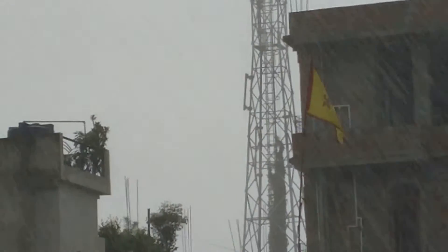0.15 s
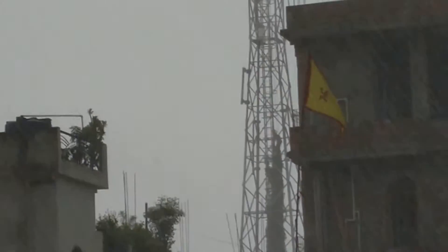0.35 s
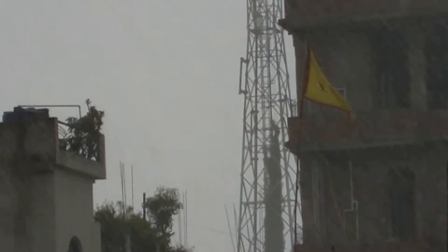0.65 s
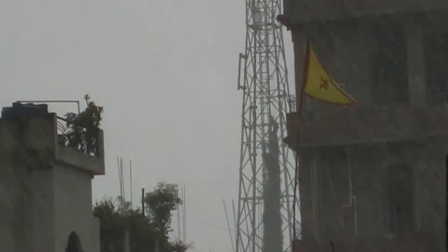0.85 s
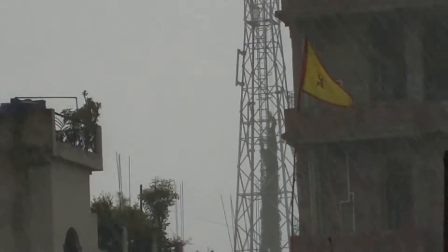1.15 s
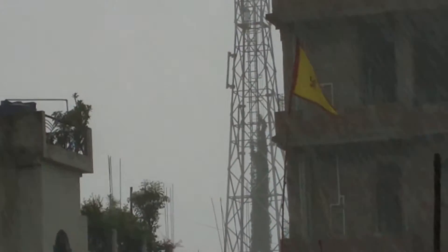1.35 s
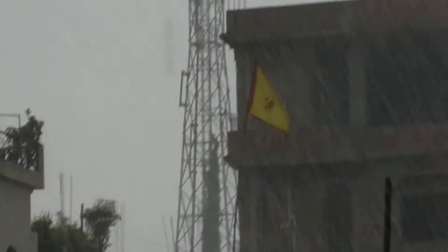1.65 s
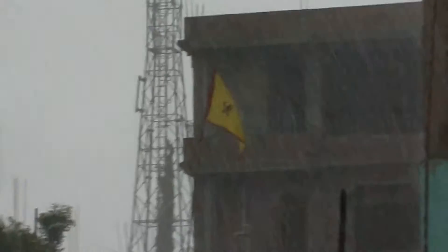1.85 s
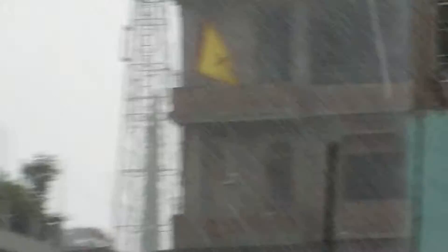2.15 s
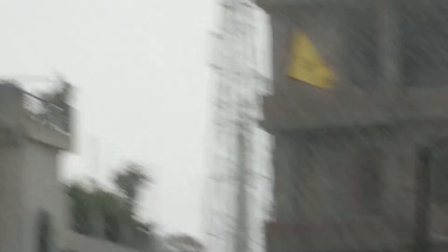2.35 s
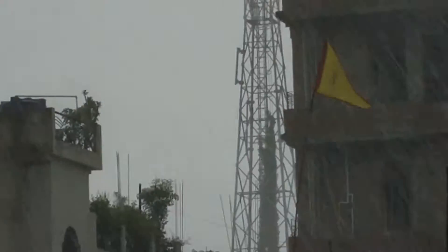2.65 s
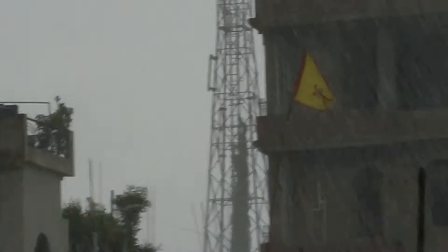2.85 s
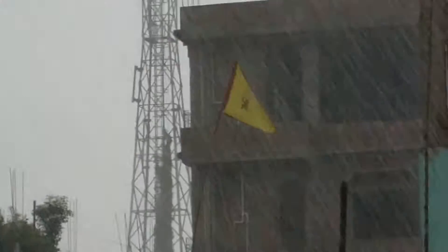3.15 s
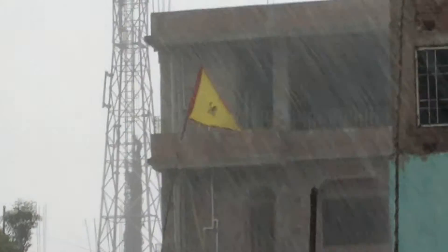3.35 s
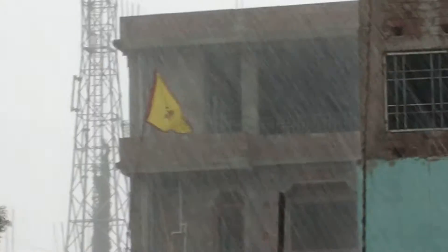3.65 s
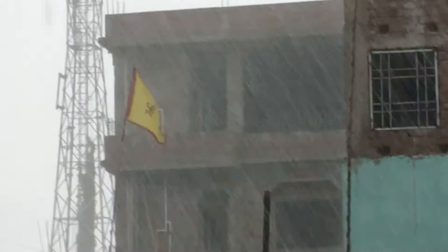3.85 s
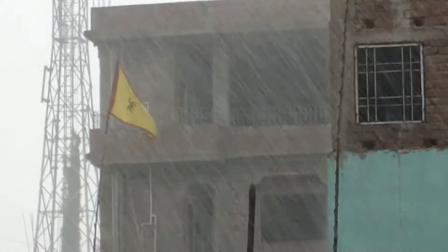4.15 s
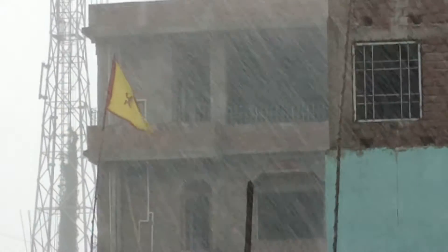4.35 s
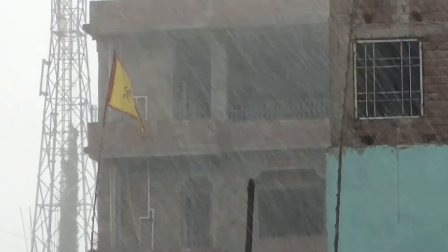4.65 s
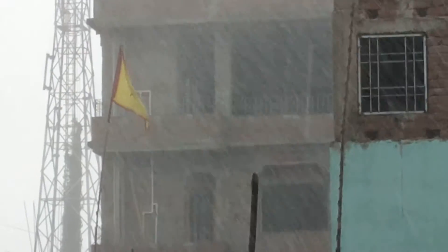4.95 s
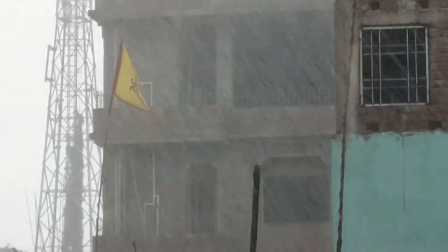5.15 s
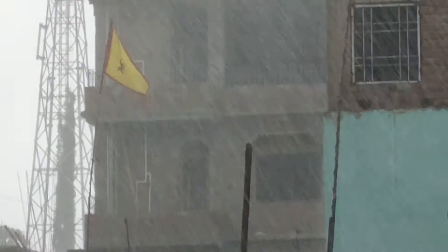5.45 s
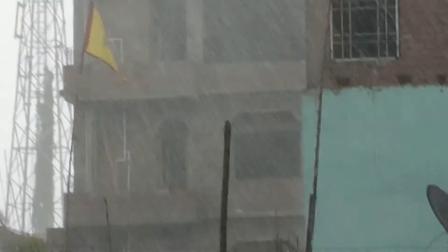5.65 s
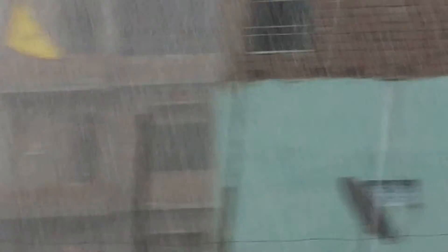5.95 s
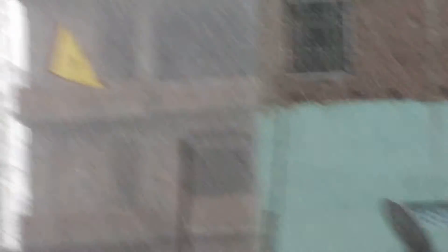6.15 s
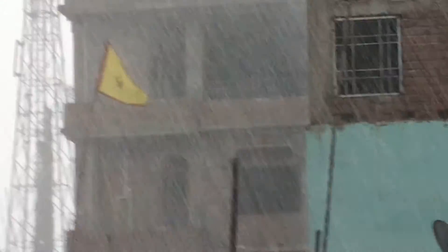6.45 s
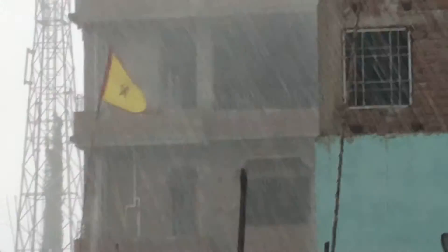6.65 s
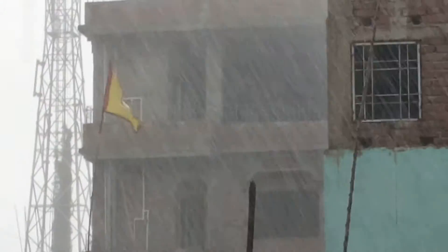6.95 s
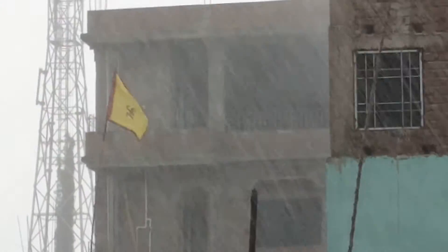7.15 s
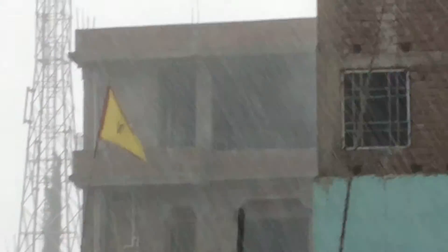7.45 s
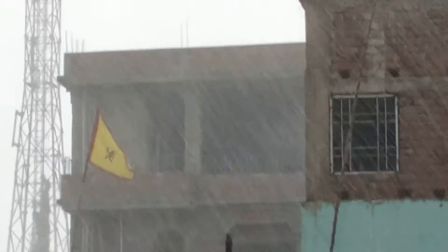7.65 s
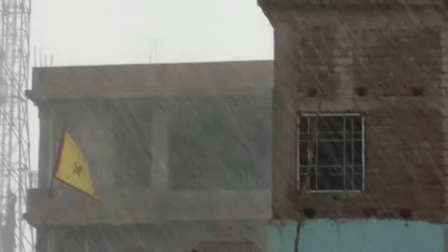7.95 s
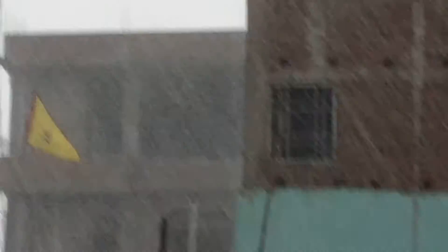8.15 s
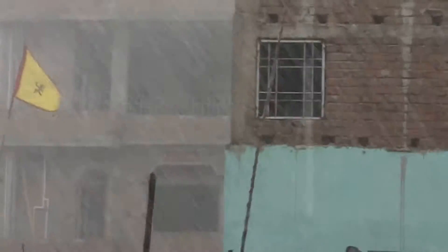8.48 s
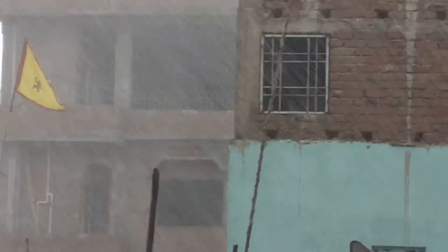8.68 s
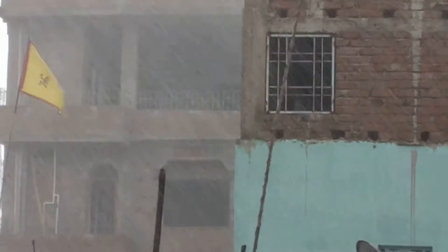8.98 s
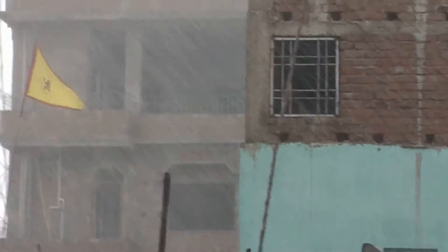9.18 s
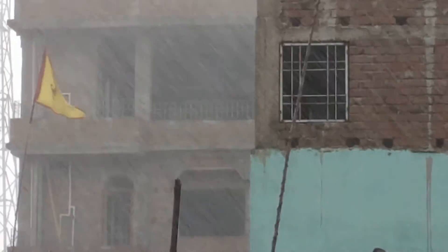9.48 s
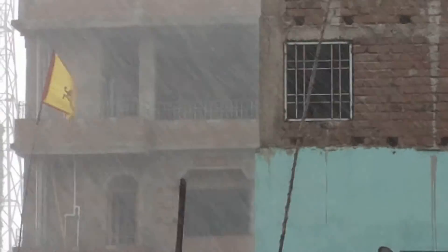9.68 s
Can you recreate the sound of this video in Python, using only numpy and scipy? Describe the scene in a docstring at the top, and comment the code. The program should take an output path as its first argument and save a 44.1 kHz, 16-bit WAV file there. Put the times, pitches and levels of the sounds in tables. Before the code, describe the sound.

Steady heavy rain heard from a shelter's edge in a town. Bright, crisp near drops tick densely and swing in strength, loudest at the start and thinner after the middle. Scattered big drops smack sharply close by, one hardest near three seconds. Wind rumbles and thumps the microphone through the first six seconds, then calms. A soft far wash of rain on roofs and streets runs throughout.

```python
"""Bright ticks and spatter of near rain, swinging closer and away with the wind, heard from a shelter's edge.
Near drops are filtered random clicks with splashes; the largest are short rings with spray.
Runoff slaps on wet ground in clusters of duller ticks; gusts rumble and thump at the microphone.
Far roofs and streets in a town give a steady wash of filtered noise and a hiss of dense clicks."""
import sys
import numpy as np
from scipy import signal
from scipy.fft import rfft, irfft
from scipy.io import wavfile

SR = 44100
rng = np.random.default_rng(int(sys.argv[2]) if len(sys.argv) > 2 else 0)


def wav_out(sig):
    """Save sig, one row per channel (or a flat mono array), as 16-bit PCM at SR to the path in sys.argv[1]."""
    wavfile.write(sys.argv[1], SR, np.round(np.clip(np.atleast_2d(sig).T, -1, 1) * 32767).astype(np.int16))


N = 433062
TIME = np.arange(N) / SR  # seconds

# Strength of the near rain as the wind swings it. Each row: time in seconds, relative level in dB.
SHOWER = [(0, -15), (.5, -17.5), (1.8, -16.5), (2.65, -22.5), (3.4, -19.5), (4.45, -20.5), (5.7, -27),
          (6.5, -28.5), (6.85, -25), (8.85, -22), (9.25, -27), (9.82, -26.5)]
# Spectrum of near drops. Each row: frequency in Hz, relative density in dB per Hz.
TICK = [(1500, -64), (3000, -45), (4000, -33.5), (5000, -26), (6000, -11), (6700, -5), (7200, 0),
        (7550, 0.8), (7720, 0.5), (8000, -15.5), (8250, -15.5), (8480, -31.5), (8650, -66)]


def patter():
    """Near drops tick in flurries, each followed by its splash."""
    hits = impacts(per_s=2100, spread_db=3.5, largest=4.2)
    crown = 0.8 * splash(hits, decay_s=0.003, per_s=5000)  # the drop bursts
    spray = 1.02 * splash(hits, decay_s=0.0035, per_s=4000)  # its finer droplets
    ticks = evened(colour(hits + crown + spray, TICK))
    level_db = follow(SHOWER) - 5.0 + 0.85 * drift(25)
    return ticks * gain_of(level_db)


def splash(hits, decay_s, per_s):
    """Every impact throws fine droplets that patter down with fading strength."""
    fade = np.exp(-2 / (decay_s * SR))  # of energy, so amplitude fades over decay_s
    energy = signal.lfilter([1 - fade], [1, -fade], hits ** 2)
    droplets = evened(rng.standard_normal(N) * (rng.random(N) < per_s / SR))
    return np.sqrt(energy) * droplets


def large_drops():
    """A short ringing smack, a second as the drop collapses, and a dying scatter of droplets."""
    # The largest drops, landing close by. Each row: start in seconds, relative peak in dB.
    drops = [(0.2088, -10), (0.2217, -6), (0.619, -8), (0.6802, -5), (0.933, -4), (0.9818, -11),
             (1.289, -11), (1.3203, -6.5), (1.5598, -5.5), (2.139, -6), (2.4238, -5), (2.5293, -7),
             (3.1232, -0.5), (3.461, -6), (3.555, -6), (3.5991, -13), (3.861, -10), (3.918, -16),
             (4.0368, -4), (4.1067, -11.5), (4.2292, -9), (5.039, -9.5), (5.238, -11), (7.2113, -12),
             (7.5696, -9.5), (7.7122, -8.5), (8.0858, -8), (8.983, -9.5), (9.2528, -5)]
    pitch_hz, scatter_hz = 7240, 200
    smack_s, spray_decay_s, droplets_per_s = 0.0002, 0.022, 3000
    out, t = np.zeros(N), np.arange(3072) / SR
    for start_s, db in drops:
        hz = pitch_hz + scatter_hz * rng.standard_normal()
        age = t / smack_s
        ring = age ** 2 * np.exp(-age) * np.sin(2 * np.pi * hz * t)
        smack = colour(ring, TICK)
        smack *= gain_of(db - 0.8) / abs(smack).max()
        add(out, start_s, smack)
        add(out, start_s + rng.uniform(0.0014, 0.011), 0.48 * smack)
        droplets = evened(rng.standard_normal(len(t)) * (rng.random(len(t)) < droplets_per_s / SR))
        spray_db = 0.97 * db - 15.5  # bigger drops throw stronger spray
        add(out, start_s, gain_of(spray_db) * colour(droplets * np.exp(-t / spray_decay_s), TICK))
    return out


def runoff():
    """Gathered water breaks on the ground in duller ticks, louder in harder rain and in each slap."""
    # Slaps on wet ground. Each row: start in seconds, relative level in dB.
    slaps = [(1.72, -24), (2.754, -33), (3.115, -27), (5.501, -28.5), (6.39, -34), (7.09, -28.5),
             (7.14, -39), (7.58, -33.5), (8.1, -34), (8.54, -27), (8.76, -31), (8.87, -29)]
    # Runoff spectrum. Each row: frequency in Hz, relative density in dB per Hz.
    splat_spectrum = [(2000, -47.5), (3200, -35), (4300, -14), (5400, -3), (6500, -0.5), (7500, 7),
                      (8000, 0.5), (8600, -36)]
    trickle_db = -18  # between slaps, relative to the shower curve
    attack_s, decay_s = 0.00091, 0.033
    swell = gain_of(follow(SHOWER) + trickle_db + 2.5 * drift(18))
    t = np.arange(SR // 4) / SR
    slap = (1 - np.exp(-t / attack_s)) * np.exp(-t / decay_s)
    for start_s, db in slaps:
        add(swell, start_s, gain_of(db) * slap)
    ticks = evened(colour(impacts(per_s=2800, spread_db=3.5, largest=3.8), splat_spectrum))
    return gain_of(2.0) * swell * ticks


def wind():
    """A rolling rumble with sudden thumps; a thump of higher reach carries less deep bass."""
    # Hardest thumps. Each row: peak time in seconds, level in dB, upper reach in Hz.
    thumps = [(0.489, -29.5, 70), (.67, -31.5, 130), (0.859, -32, 70), (1.93, -34, 190), (2.134, -33, 130),
              (2.277, -29, 110), (2.335, -23.5, 101), (2.545, -28.5, 150), (2.63, -35, 120),
              (3.291, -35, 65), (4.215, -28, 248), (4.33, -39, 100), (4.48, -41, 101), (4.979, -35, 170),
              (5.711, -32.5, 220)]
    half_width_s = 0.016
    rumble = evened(eddies(reach_hz=133, size=N))
    out = rumble * wind_push() * gain_of(1.5 + 1.2 * drift(22))
    t = np.arange(-SR // 8, SR // 8) / SR
    push = np.exp(-0.5 * (t / half_width_s) ** 2)
    for peak_s, db, reach_hz in thumps:
        low_cut = signal.butter(1, 0.3 * reach_hz, "highpass", fs=SR)
        thump = push * signal.lfilter(*low_cut, eddies(reach_hz, size=len(t)))
        thump *= np.linalg.norm(push) / np.linalg.norm(thump)
        add(out, peak_s + t[0], gain_of(db) * thump)
    return out


def eddies(reach_hz, size):
    """Turbulent pressure: coloured noise that rolls off above its reach."""
    # Wind spectrum. Each row: frequency in Hz, relative density in dB per Hz.
    wind_spectrum = [(5, -18), (15, -1.5), (35, 0), (70, -3), (120, -3.5), (190, -7.5), (350, -13.5),
                     (700, -37), (2000, -67)]
    swirl = colour(rng.standard_normal(size + SR // 4), wind_spectrum, size=16384)
    low_pass = signal.butter(2, reach_hz, fs=SR, output="sos")
    return signal.sosfilt(low_pass, swirl)[-size:]  # drops the filters' onset


def wind_push():
    """Each gust swells out of the breeze, flutters, and dies a little faster than it came."""
    # Gusts. Each row: peak time in seconds, swell time in seconds, relative level in dB.
    gusts = [(.55, 0.1, -41), (.97, .14, -43.5), (1.5, .04, -48), (2.1, 0.18, -40), (2.58, 0.082, -35.5),
             (4.25, 0.22, -41), (4.96, 0.1, -36), (5.68, 0.12, -40), (6.2, 0.082, -41)]
    fall_ratio = 0.96  # dying time over swell time
    breeze_db, flutter_db, flutter_hz = -57, 3.5, 22
    power = np.zeros(N)
    for peak_s, swell_s, db in gusts:
        away = np.maximum(peak_s - TIME, (TIME - peak_s) / fall_ratio) / swell_s
        power += (gain_of(db) * np.exp(-away)) ** 2
    flutter = gain_of(flutter_db * drift(flutter_hz))
    return np.sqrt(gain_of(breeze_db) ** 2 + power * flutter ** 2)


def town():
    """Countless far drops merge into a low wash and a thin hiss."""
    # Rain on far roofs and streets. Each row: time in seconds, relative level in dB.
    town_level = [(0, -40.5), (4.7, -39), (5.8, -41), (8.4, -40), (9.82, -40.5)]
    # Spectra of wash and hiss. Each row: frequency in Hz, relative density in dB per Hz.
    wash_spectrum = [(20, -9.5), (60, -4), (120, -7), (165, -10), (240, -5.5), (380, -5), (425, -1),
                     (600, -4), (690, -2.5), (800, 1.5), (920, -1.5), (1020, -5.5), (1600, -12),
                     (2900, -26), (4000, -42.5)]
    hiss_spectrum = [(2000, -28), (3000, -15.5), (3600, -4.5), (4300, 0), (5200, 0), (6500, 5.5),
                     (7500, 14), (8000, -1.5), (8500, -37)]
    wash_db = follow(town_level) + 0.5 + 0.3 * drift(7.0)
    wash = colour(rng.standard_normal(N), wash_spectrum) * gain_of(wash_db)
    hiss = evened(colour(impacts(per_s=9000, spread_db=1.5, largest=2.9), hiss_spectrum))
    hiss_db = -36.0 + 0.15 * (follow(SHOWER) + 22.5) + 0.47 * drift(6)  # leans on the shower slightly
    return wash + hiss * gain_of(hiss_db)


def impacts(per_s, spread_db, largest):
    """Random clicks of either sign: many small, a few large, capped at largest * spread_db."""
    size = gain_of(spread_db * np.minimum(rng.exponential(1, N), largest))
    return size * rng.choice([-1., 1.], N) * (rng.random(N) < per_s / SR)


def colour(x, spectrum, size=4096):
    """Minimum-phase filter of unit energy with the given spectrum."""
    hz, db = np.transpose(spectrum)
    bin_hz = abs(np.fft.fftfreq(size, 1 / SR))
    bin_db = np.interp(np.log(bin_hz + 1), np.log(hz), db)
    log_gain = np.log(gain_of(bin_db))
    ring = np.fft.ifft(np.exp(np.conj(signal.hilbert(log_gain)))).real[:size // 2]
    return signal.oaconvolve(x, ring / np.linalg.norm(ring))[:len(x)]


def drift(rate_hz):
    """Smooth random curve of rms 1, its spectrum fading around rate_hz."""
    hz = np.fft.rfftfreq(N, 1 / SR)
    shape = np.exp(-(hz / rate_hz) ** 2) * hz / (hz + 1)
    return evened(irfft(rfft(rng.standard_normal(N)) * shape, N))


def follow(curve):
    """A control curve at every sample."""
    return np.interp(TIME, *np.transpose(curve))


def gain_of(db):
    """Decibels to amplitude."""
    return 10 ** (np.asarray(db) / 20)


def evened(x):
    """Scales to rms 1."""
    return x / np.sqrt(np.mean(x ** 2) + 1e-20)


def add(mix, start_s, sound):
    """Mixes a sound in at start_s, in place."""
    part = mix[max(0, round(start_s * SR)):][:len(sound)]
    part += sound[:len(part)]


def scene():
    """Sums near rain, wind and far wash in one channel, with brief level dips."""
    # The level dips briefly. Each row: centre in seconds, depth in dB.
    dips = [(.545, 4), (.72, 3.5), (1.63, 3), (1.85, 2.5), (3.175, 5.5)]
    half_width_s = 0.047
    dip_db = sum(db * np.exp(-((TIME - centre_s) / half_width_s) ** 4) for centre_s, db in dips)
    mix = town() + patter() + large_drops() + runoff() + wind()
    return (mix * gain_of(-dip_db))[None]


def record(dry):
    """Rounds off the loudest peaks by their envelope, then limits the band."""
    ceiling, edge_hz = 0.55, 8650
    envelope = abs(signal.hilbert(dry))
    rounded = dry / (1 + (envelope / ceiling) ** 6) ** (1 / 6)
    low_pass = signal.firwin(511, edge_hz, window=("kaiser", 9), fs=SR)
    return signal.oaconvolve(rounded, low_pass[None], "same")


dry = scene()
out = record(dry)
wav_out(out)
```